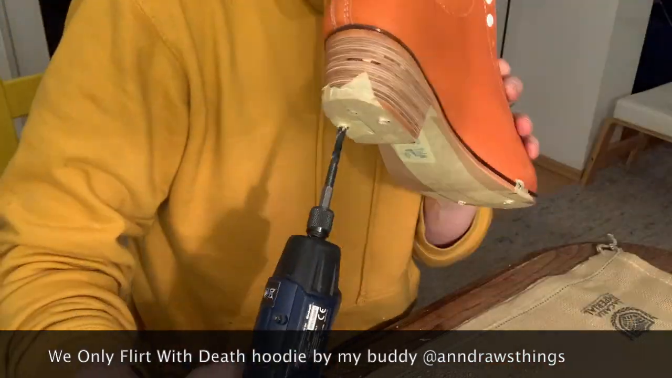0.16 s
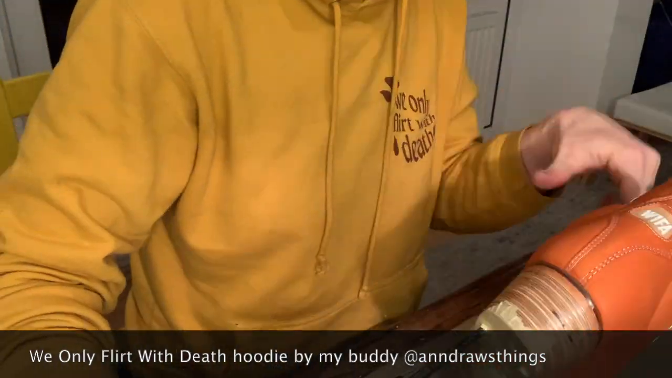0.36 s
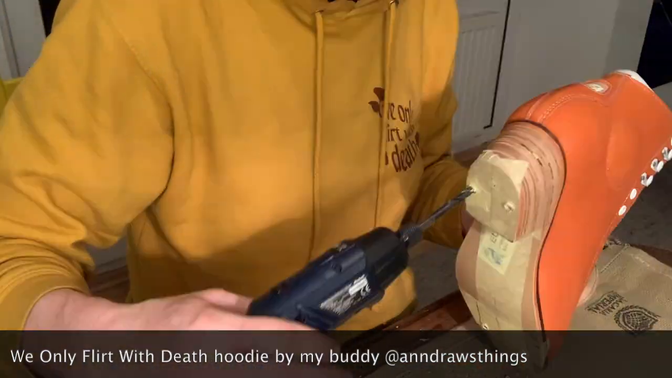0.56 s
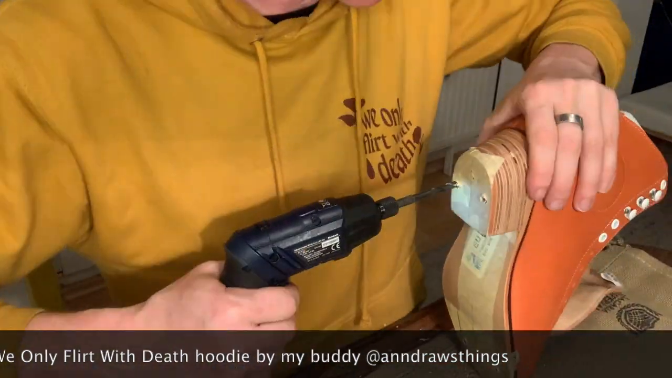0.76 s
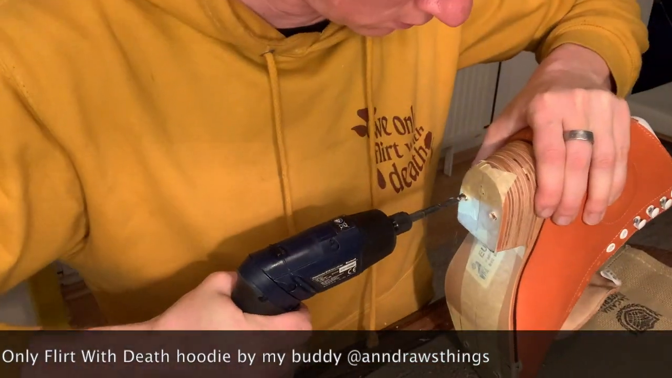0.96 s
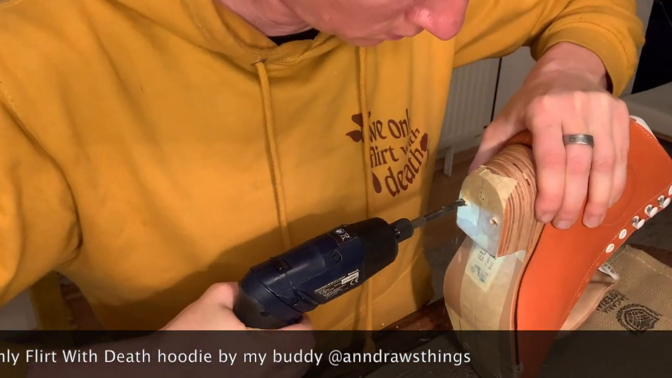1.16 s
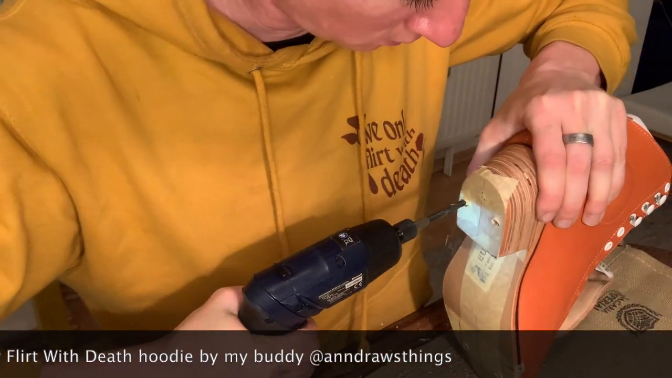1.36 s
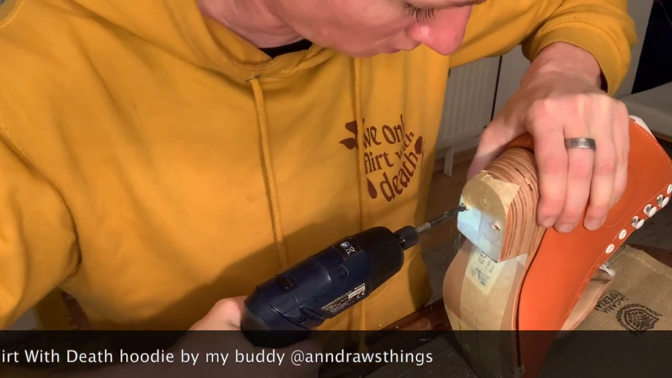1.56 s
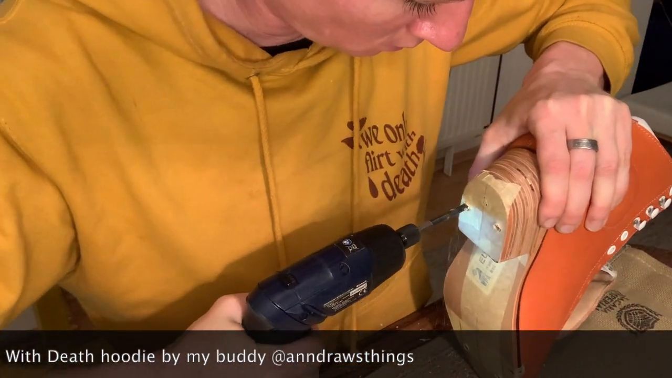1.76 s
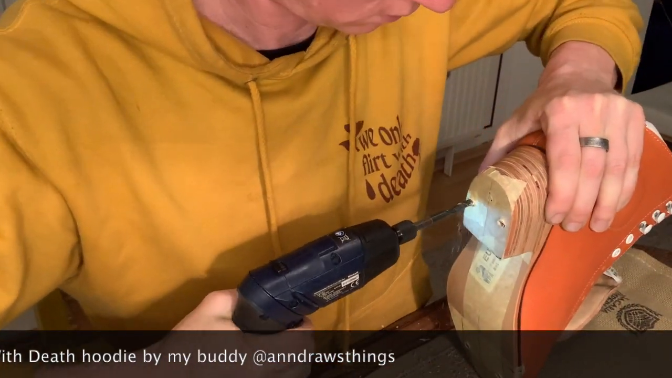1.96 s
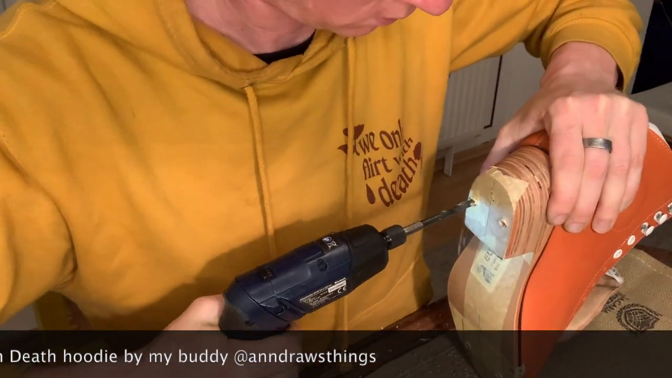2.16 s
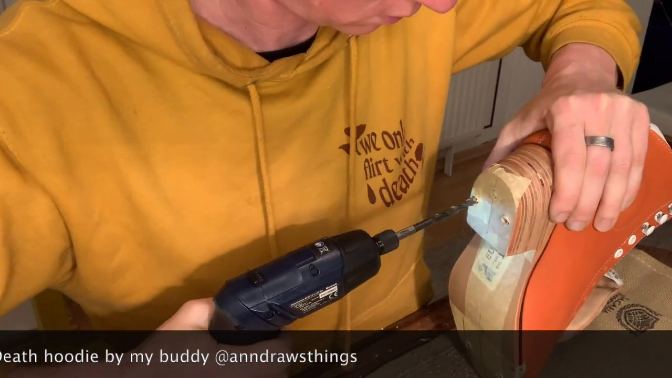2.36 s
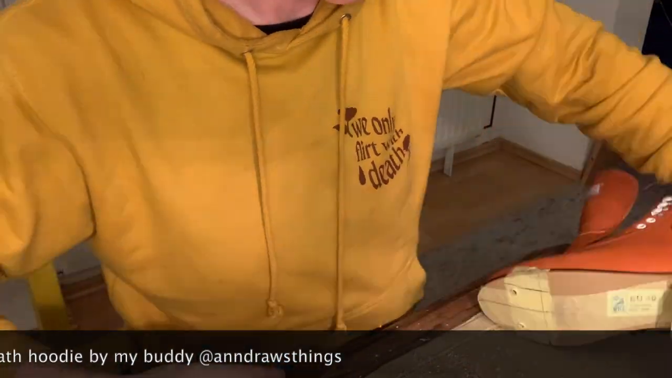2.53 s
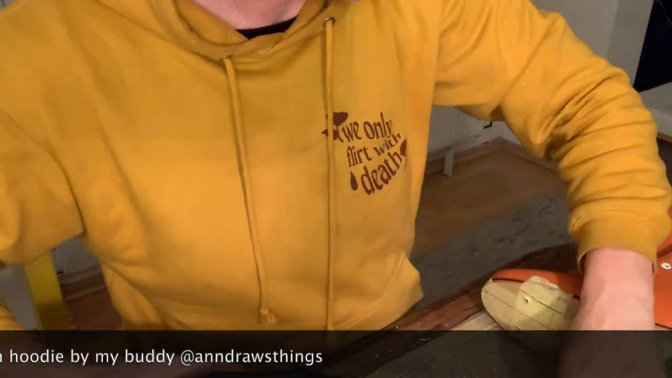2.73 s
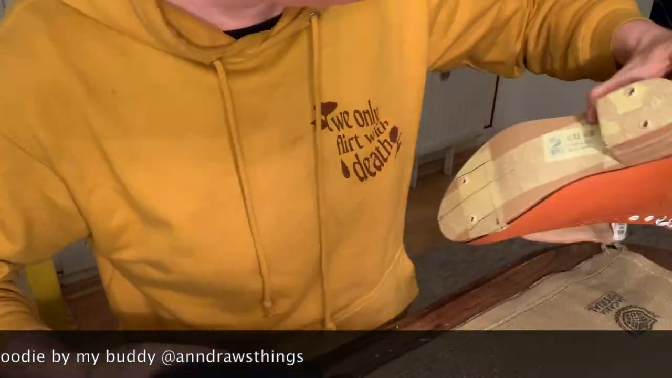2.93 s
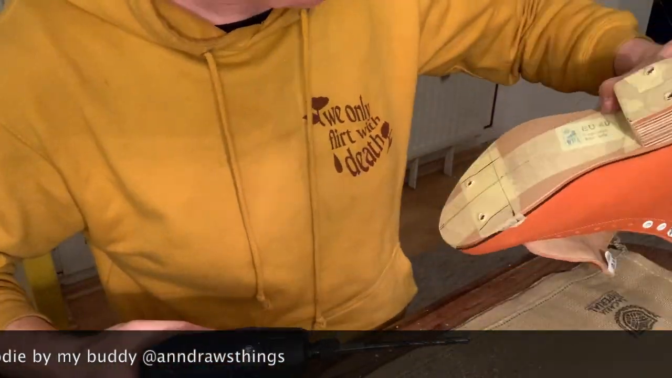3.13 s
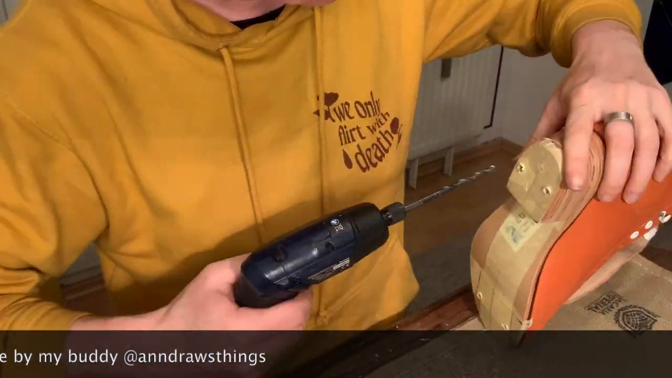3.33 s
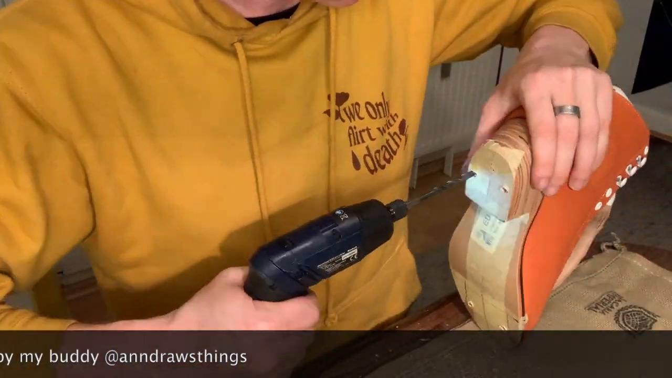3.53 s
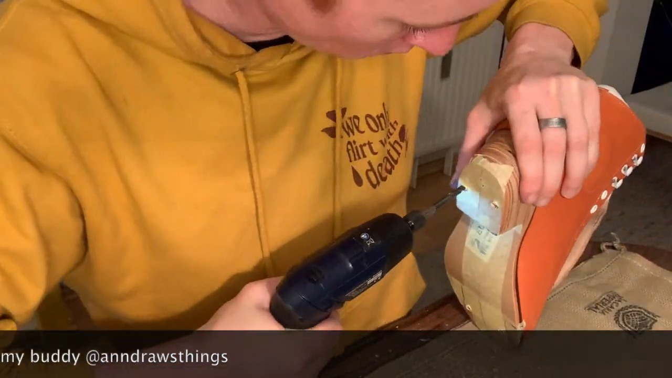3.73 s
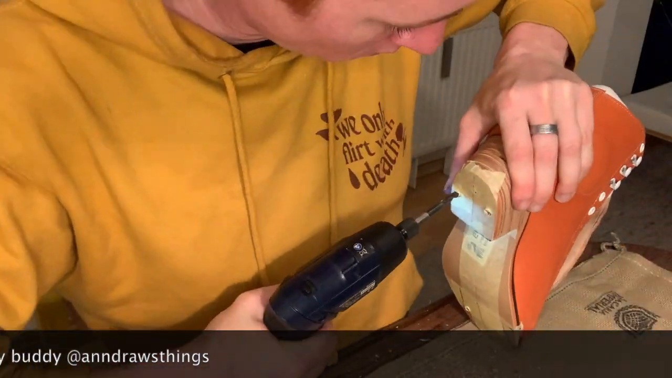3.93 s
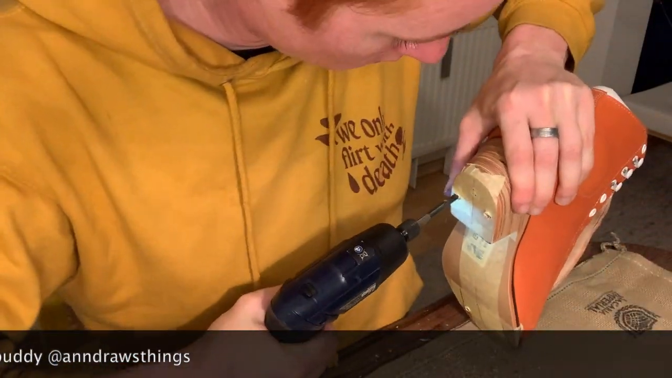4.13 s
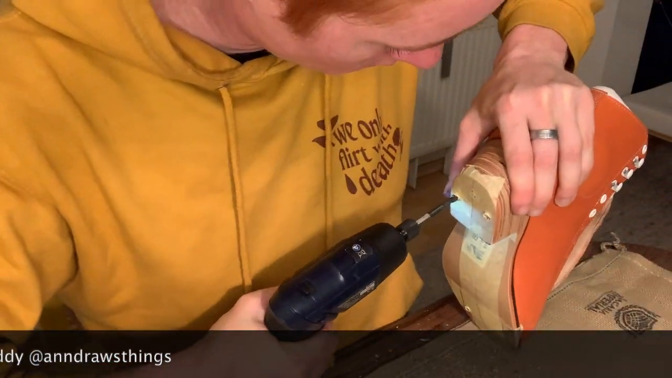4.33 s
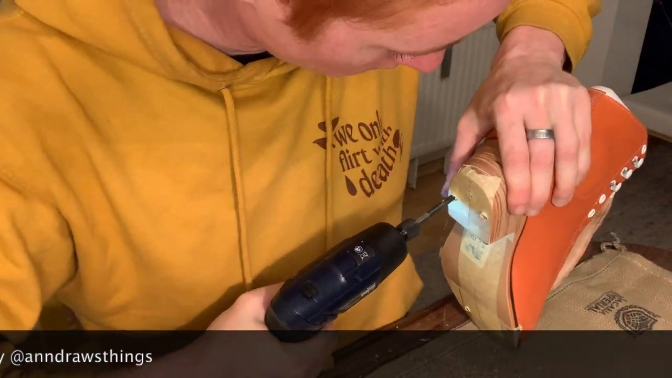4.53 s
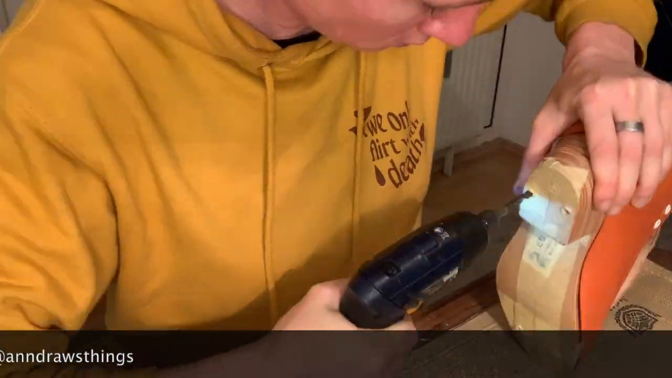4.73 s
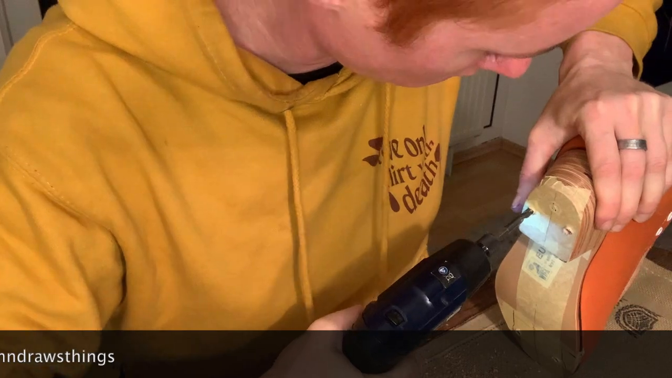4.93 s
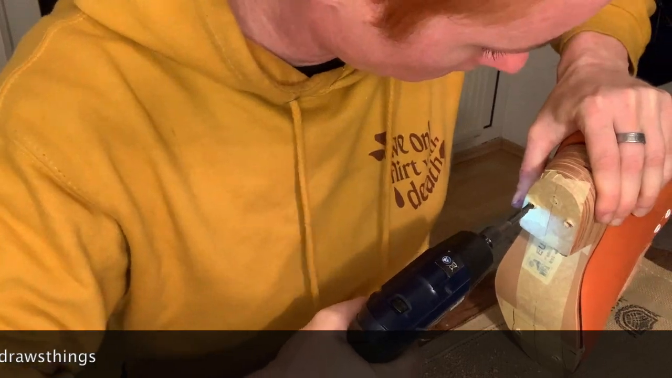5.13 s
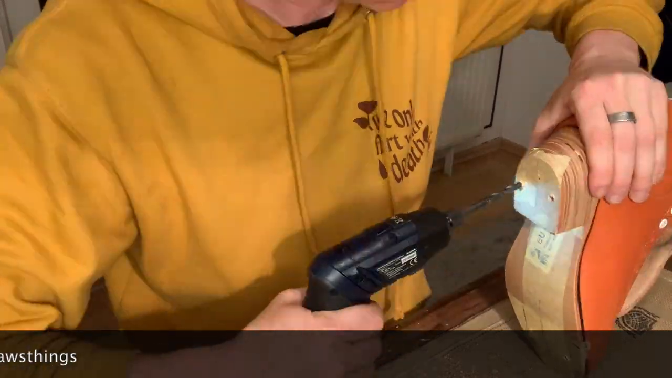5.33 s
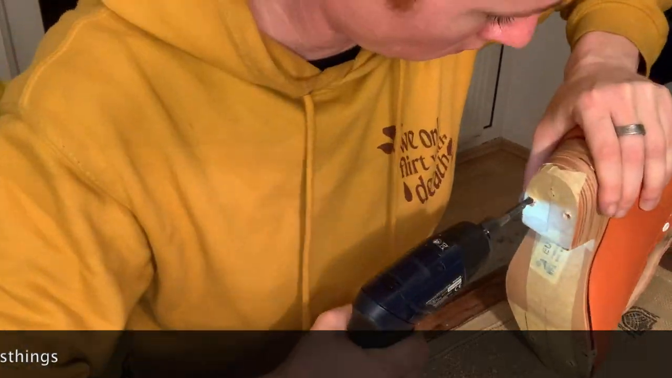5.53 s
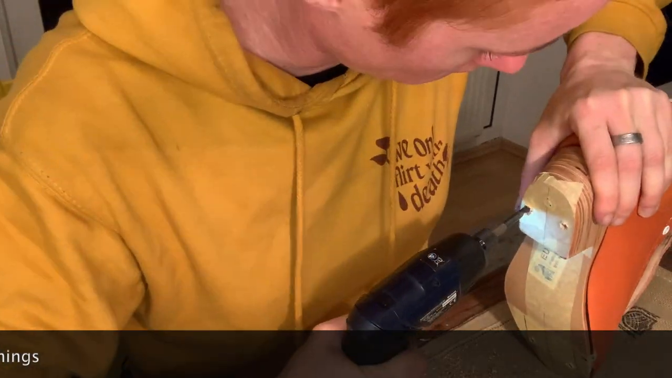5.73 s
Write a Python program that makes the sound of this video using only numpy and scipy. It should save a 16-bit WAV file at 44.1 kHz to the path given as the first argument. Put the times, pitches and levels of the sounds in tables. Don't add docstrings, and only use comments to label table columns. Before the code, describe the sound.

Two wooden knocks, then a geared drill motor whines and labours in wood, pauses for handling clatter, and drills again, bogging and catching.

```python
import sys
import numpy as np
from scipy import signal
from scipy.fft import rfft, irfft, next_fast_len
from scipy.io import wavfile
from scipy.ndimage import uniform_filter1d, map_coordinates

SR = 44100
rng = np.random.default_rng(int(sys.argv[2]) if len(sys.argv) > 2 else 0)


def convert_level_to_amplitude(level_db):
    exponent = np.asarray(level_db, float) / 20
    return 10 ** exponent


def to_wav(sig):
    pcm = np.clip(np.atleast_2d(sig), -1, 1) * 32767
    pcm = np.round(pcm).astype(np.int16)
    wavfile.write(sys.argv[1], SR, pcm.T)


N = 254898
T = np.arange(N) / SR


def unit(x):
    return x / np.sqrt(np.mean(x ** 2) + 1e-20)


def along(points, hz):
    f, v = np.transpose(points)
    return np.interp(np.log(hz + 1), np.log(f + 1), v)


def curves(rows):
    s, *cols = np.transpose(rows)
    return [np.interp(T, s, c) for c in cols]


def wobble(rate):
    return map_coordinates(rng.standard_normal(int(N * rate / SR) + 4), [T * rate])


def bump(s, width, power=2):
    return np.exp(-np.abs((T - s) / width) ** power)


def filtered(x, response):
    m = next_fast_len(N + SR // 2)
    return irfft(rfft(x, m) * response(np.fft.rfftfreq(m, 1 / SR)), m)[..., :N]


def peaks(modes, hz):
    return np.sqrt(1 + sum(convert_level_to_amplitude(2 * db) / (1 + (2 * (hz - c) / w) ** 2) for c, w, db in modes))


def rush(gain, alike, patchy_db):
    z = signal.stft(rng.standard_normal((2, N)), nperseg=256)[2]
    field = uniform_filter1d(rng.standard_normal(z.shape[1:]), size=8, axis=0)
    field = uniform_filter1d(field, size=5, axis=1)
    pair = signal.istft(z * convert_level_to_amplitude(patchy_db * unit(field)), nperseg=256)[1][:, :N]

    def mid_side(hz):
        turn = np.arccos(np.clip(along(alike, hz), -.99, .99)) / 2
        return gain(hz) * [np.cos(turn), np.sin(turn)]

    mid, side = filtered(pair, mid_side)
    return np.array([mid + side, mid - side]) / np.std(mid)


def ring(modes, t, lasting):
    drift = np.cumsum(rng.normal(0, .025, len(t)))
    out = 0
    for hz, db, t60 in modes:
        decay = convert_level_to_amplitude(db + rng.normal(0, 1.0) - 60 * t / (t60 * lasting))
        out = out + decay * np.sin(2 * np.pi * hz * rng.normal(1, .006) * t + drift)
    return out


# t/s, level/dB
ROOM_GAIN = [(.06, -51.5), (.1, -66), (.44, -53.5), (.46, -66.5), (.62, -64), (.66, -55.5), (2.0, -71.5),
             (2.6, -60), (3.1, -63.5)]
# f/Hz, level/dB per Hz
HUM_SPECTRUM = [(120, -73.5), (200, -28.5), (280, -18), (420, -11), (700, -14), (1000, -16.5),
                (1500, -20.5), (3000, -30), (8000, -40), (16000, -48.5)]
# f/Hz, width/Hz, level/dB
HUM_TONE = [(397, 16, 3.5), (616, 77, 14.5)]
# f/Hz, level/dB per Hz
CLOTH_SPECTRUM = [(710, -40.5), (1200, -10), (2300, -6.5), (3950, -6.5), (5900, -9), (8720, -10.5),
                  (16000, -23)]
# t/s, length/s, level/dB
SCUFFS = [(0, 0.025, -62.5), (0.032, 0.069, -67.5), (0.107, 0.044, -64), (0.191, 0.12, -72),
          (0.266, 0.048, -65), (0.284, 0.068, -69), (0.355, 0.09, -65), (0.554, 0.016, -73.5),
          (0.574, 0.046, -71), (0.666, 0.086, -70.5), (2.586, 0.08, -68.5), (2.824, 0.081, -81),
          (2.897, 0.072, -73), (2.985, 0.028, -67.5), (3.2, 0.045, -86), (3.287, 0.035, -80),
          (3.483, 0.065, -70.5), (3.503, 0.11, -65.5)]


def background():
    hum_db, = curves(ROOM_GAIN)
    low_db = -74 - 15 * np.clip(1 - T, 0, 1)
    low = rush(lambda hz: 1 / (1 + ((hz - 308) / 12) ** 4), [(200, .6)], patchy_db=1.5)
    hum = rush(lambda hz: convert_level_to_amplitude(along(HUM_SPECTRUM, hz)) * peaks(HUM_TONE, hz),
               [(200, 0.97), (800, 0.96)], patchy_db=2.0)
    fibres = unit(convert_level_to_amplitude(3.0 * wobble(90) + 2.3 * wobble(230)))
    cloth = fibres * rush(lambda hz: convert_level_to_amplitude(along(CLOTH_SPECTRUM, hz)), [(2000, 1.0), (8000, 0.26)], patchy_db=4)
    strokes = 0
    for s, length, db in SCUFFS:
        strokes = strokes + convert_level_to_amplitude(db) * np.clip(np.minimum(T - s, s + length - T) / 0.01, 0, 1)
    return convert_level_to_amplitude(low_db - 0.5) * low + convert_level_to_amplitude(hum_db - 5.0) * hum + strokes * cloth


# t/s, peak level/dB, thump/dB, hardness/dB, crack/dB
KNOCKS = [(0.004, -53, -19, -23, -20), (0.036, -45.5, -24, -30, -28), (0.281, -16.5, -20.5, -22, -38.5),
          (0.619, -13, -15.5, -12.5, -33.5), (0.829, -34, -24, 1, -10.5), (1.908, -31.5, -19, 3.5, -23),
          (2.561, -19.5, -59, -3, -33), (2.606, -35.5, -18, -19, -46), (2.829, -39.5, -41, -17, -57),
          (2.884, -47.5, -15, -11, -41), (3.274, -53, 12, -34, -41.5), (3.365, -55.5, -15, -26, -38),
          (3.484, -64, 4, -22, -30), (3.514, -52.5, 7, -17, -25), (3.557, -48, -13, -33, -36),
          (4.762, -34.5, 0.5, -28, -8), (4.838, -39, -25, -20, -30), (5.232, -34.5, -29, 1, -24),
          (5.296, -39.5, -25, -3, -10), (5.328, -31.5, -11, -28, -48)]
# f/Hz, level/dB, t60/s
BLOCK_MODES = [(485, -6, 0.058), (616, -5.5, 0.076), (752, 3, 0.035), (938.5, 3.5, 0.065),
               (1036, 10.5, 0.041), (1093, -4, 0.2), (1247, -9.5, 0.16), (1419, -11, 0.1)]
# f/Hz, level/dB, t60/s
CORNER_MODES = [(1454, 6.5, 0.059), (1712, 1.5, 0.06), (2010, -6.5, 0.11), (2470, 0.5, 0.08),
                (2584, 2.5, 0.056), (3030, -9.5, 0.027), (3400, -15.5, 0.031)]


def knocks():
    hand_damping = 0.76
    clack_band = signal.butter(3, (1300, 3400), 'bandpass', fs=SR, output='sos')
    out, t = np.zeros(N + SR), np.arange(SR // 4) / SR
    for s, db, thump_db, hard_db, crack_db in KNOCKS:
        thump = convert_level_to_amplitude(thump_db + 8.5 - 60 * t / 0.023) * np.sin(2 * np.pi * 420 * t)
        grit = signal.lfilter([1, 0, -1], [1, -.5, .45], rng.standard_normal(len(t)))
        crack = convert_level_to_amplitude(crack_db + 11.5 - 60 * t / 0.044) * grit
        body = ring(BLOCK_MODES, t, hand_damping)
        body = body + convert_level_to_amplitude(hard_db - 1.5) * ring(CORNER_MODES, t, hand_damping)
        dense = signal.lfilter([.03, 0, -.03], [1, -1.92, .94], rng.standard_normal(len(t)))
        body = body + convert_level_to_amplitude(2.0 - 60 * t / (0.062 * hand_damping)) * dense
        clack = signal.sosfilt(clack_band, rng.standard_normal(len(t)))
        body = body + convert_level_to_amplitude(hard_db + 11.5 - 60 * t / 0.031) * clack
        contact = 1 - np.exp(-(t / .0017) ** 2)
        out[round(s * SR) - 30:][:len(t)] += convert_level_to_amplitude(db - 6) * (body + thump + crack) * contact

    def thin_lows(hz):
        jf = 1j * hz + 1
        return 1 / (1 + (210 / jf) ** 2 + 300 / jf) * 1j * hz / (1j * hz + 150)

    return filtered(out[:N], thin_lows)


# t/s, peak level/dB, f/Hz, t60/s, share of tone
TICKS = [(0.065, -34, 7200, 0.02, 0.3), (0.335, -46, 6130, 0.031, 0.22), (.387, -41, 2200, 0.011, 0.57),
         (0.429, -58, 2470, .02, 1.7), (0.675, -47, 2070, 0.023, 0.74), (.717, -51.5, 3260, 0.024, 0.36),
         (2.644, -54, 3580, .015, 0.59), (2.658, -52, 9490, .01, .5), (2.697, -60, 9000, .01, 0.35),
         (2.795, -59.5, 4380, 0.018, 0.85), (2.847, -66, 5400, 0.056, 2.5),
         (2.975, -65, 9900, 0.0091, 0.28), (3.329, -66, 5000, 0.0054, .6), (3.515, -44, 3950, 0.0087, 0.49),
         (2.609, -53, 4500, .02, 0.98), (3.483, -62.5, 2490, 0.014, 0.55)]


def ticks():
    out, t = np.zeros(N + SR), np.arange(SR // 10) / SR
    for s, db, hz, t60, tone in TICKS:
        jitter = np.cumsum(rng.normal(0, .06 + 2e-5 * hz, len(t)))
        rough = np.sin(2 * np.pi * hz * t + jitter) * np.minimum(t * hz / 3, 1)
        click = 0.19 * np.diff(rng.standard_normal(len(t) + 1))
        out[round(s * SR):][:len(t)] += convert_level_to_amplitude(db - 60 * t / t60) * (tone * rough + click)
    return filtered(out[:N], lambda f: (1j * f / (1j * f + 500)) ** 2)


# f/Hz, t60/s
WALLS = [(200, 0.19), (1000, 0.25), (4000, 0.046), (12000, 0.011)]


def room(x):
    hz, t, z = signal.stft(rng.standard_normal((2, SR // 3)), SR, nperseg=256)
    tail = signal.istft(z * convert_level_to_amplitude(-60 * t / along(WALLS, hz)[:, None]), SR, nperseg=256)[1]
    return signal.fftconvolve(np.pad(x, (200, 0))[None], tail / np.linalg.norm(tail[0]), axes=1)[:, :N]


# pressed t/s, spin-up/s, let go t/s, run-down/s
PULLS = [
    (.783, .012, 2.4, .155),
    (3.541, .013, 5.8, .1),
]


def trigger():
    gain = 0
    for start, up, stop, down in PULLS:
        to_go = np.clip(1 - (T - start) / up, 0, 1)
        gone = np.clip((T - stop) / down, 0, 1)
        gain = gain + convert_level_to_amplitude(-36 * (to_go ** 2.1 + gone ** 2.74)) * (to_go < 1) * (gone < 1)
    return gain


WORKING_HZ = (440, 490, 565, 605)


def by_load(values, speed_hz):
    return np.interp(speed_hz, WORKING_HZ, values)


# t/s, shaft speed f/Hz, motor level/dB
STROKES = [
    [(.8, 515, -37), (.92, 503, -35), (1.04, 444, -35.5), (1.34, 443, -35.8), (1.855, 451, -35.3),
     (1.9, 555, -38), (2.0, 572, -38.7), (2.1, 575, -39.3), (2.2, 595, -40), (2.45, 614, -42)],
    [(3.55, 564, -44), (3.6, 621, -40), (3.635, 520, -39), (3.67, 515, -37.5), (3.71, 491, -36.5),
     (4.0, 481, -35.5), (4.07, 452, -35), (4.24, 497, -36.5), (4.36, 470, -36)],
    [(4.38, 437, -36), (4.49, 436, -36), (4.52, 488, -36), (4.68, 512, -35.7), (4.76, 546, -39.5)],
    [(4.81, 484, -37), (4.88, 448, -34.3), (5.21, 454, -34.5), (5.225, 535, -36.5), (5.29, 575, -38.5),
     (5.33, 620, -40.5)],
    [(5.345, 630, -46), (5.39, 635, -43), (5.405, 562, -39.5), (5.43, 528, -33.7), (5.5, 498, -34),
     (5.6, 489, -34.7), (5.66, 457, -35.2), (5.72, 455, -35.5), (5.78, 473, -34.5)],
]
BITES_S = (1.609, 4.222, 4.464, 4.96, 5.665)
# t/s, speed loss/%
CATCHES = [(.878, 4), (.936, 4), (.972, 3), (0.994, 4.1), (1.423, 1.5), (1.85, 2.5), (2.041, 5), (2.085, 6),
           (2.13, 5), (2.178, 4), (3.712, 4), (3.74, 3.4), (3.768, 4), (3.822, 3.5), (3.878, 3.5),
           (3.935, 3.4), (3.993, 6), (4.051, 7), (4.115, 16), (4.165, 7), (4.19, 3), (4.223, 14),
           (4.253, 8), (4.288, 25), (4.328, 22.5), (4.364, 25), (4.4, 4), (4.465, 3), (4.521, 6), (4.9, 2),
           (5.432, 4), (5.461, 3), (5.487, 3), (5.665, 4)]
DIP_PERCENT = (1.9, 1.9, 1.5, .6)
BITE_STRENGTH = (1.1, .65, 1.3, .9, .9)
# from t/s, to t/s, level/dB, dip share
PILOT = (1.05, 1.4, -13, .55)


def shaft_motion():
    gear_ratio, longer_flute = 27.2, .5
    speed_hz, motor_db = curves(sum(STROKES, []))
    starts = [rows[0][0] - .02 for rows in STROKES]
    stroke = np.clip(np.searchsorted(starts, T) - 1, 0, None)
    chuck = np.cumsum(speed_hz) / SR / gear_ratio
    angle = 2 * np.pi * (chuck - np.interp(BITES_S, T, chuck)[stroke])
    flutes = -np.cos(2 * angle) - longer_flute * np.cos(angle)
    shallow = np.interp(T, (1, *PILOT[:2]), (0, 1, 0))
    depth = by_load(DIP_PERCENT, speed_hz) * np.array(BITE_STRENGTH)[stroke] * (1 - PILOT[3] * shallow)
    dip = depth * flutes
    snag = sum(loss * bump(s, .006 + .0002 * loss, power=1.5) for s, loss in CATCHES)
    shaft = np.cumsum(speed_hz * (1 + (dip - snag + .5 * wobble(70)) / 100)) / SR
    return speed_hz, motor_db, stroke, angle, dip, snag, shaft


ORDER_3_DB = (-12.5, -13.5, -25, -28)
ORDER_6_DB = (-13.5, -19.5, -25.5, -24.5)
ORDER_9_DB = (-29.5, -14.5, -17.5, -26)
ORDER_16_DB = (-10, -5.5, -8.5, -7.5)
ORDER_32_DB = (0, -5, -5, -3)
# orders 3, 6, 16, 32 level/dB
GRIPS = [(0, 1.5, -1, 2), (2.5, -.5, -1.5, 1.5), (-2, .5, -1.5, -4), (1, 0, 1.5, -2.5), (3, -2, 2, -3)]
GRIP_9_DB = (1.5, -5, -1.5, 2, -1.5)
BREAKUP_DB = (1, 1.5, 3, 3, 1.5)
SLIP_DB = (11, 5, 4, 5, 4)
# t/s, level/dB
FADE_3 = [(.85, 5.5), (1.0, 0.5), (1.1, -3), (1.45, -1), (1.65, 2.5), (3.66, -7.5), (3.69, -1),
          (3.85, -2.5), (4.02, -1.5), (4.05, -16), (4.14, -2.5), (4.27, -1), (4.3, -0.5), (4.49, -7.5),
          (4.51, 1), (4.9, -1), (5.55, -4.5), (5.65, 2)]
# t/s, level/dB
FADE_6 = [(.9, 2), (1.15, -1.5), (1.4, 0.5), (1.85, 1), (3.64, 8), (3.72, 0.5), (3.95, -1), (4.05, 1),
          (4.24, 2), (4.28, 2.5), (4.36, -1), (4.4, 0), (4.5, -2.5), (4.56, 5), (4.75, 3), (5.0, -0.5),
          (5.5, 3), (5.7, 2)]
# t/s, level/dB
ENTRY = [(.83, 4), (.88, 6), (.96, 6.5), (1.03, 1), (1.84, 2.5), (1.87, 2), (2.1, 6.5), (2.2, 3.5),
         (2.41, 4.5), (2.44, -12.5), (3.6, 7), (4.0, -4), (4.04, -2.5), (4.5, -1), (4.75, 2.5), (4.85, 0),
         (5.4, 2.5), (5.7, 1.5)]
# shaft order, order it follows, level against it/dB
SIDEBANDS = [(19.24, 16, -27.5), (22.2, 16, -21.5), (24.2, 16, -22), (27.4, 16, -15), (35.1, 32, -25),
             (1.182, 3, -24), (1.75, 3, -15), (2.326, 3, -23)]


def order_levels(speed_hz, stroke, angle, snag):
    laws = (ORDER_3_DB, ORDER_6_DB, ORDER_16_DB, ORDER_32_DB)
    level = {}
    for order, values, grip_db in zip((3, 6, 16, 32), laws, np.transpose(GRIPS)[:, stroke]):
        level[order] = by_load(values, speed_hz) + grip_db
    level[9] = by_load(ORDER_9_DB, speed_hz) + np.array(GRIP_9_DB)[stroke]
    for order, depth in zip((3, 6, 16, 32, 9), BREAKUP_DB):
        level[order] = level[order] + depth * wobble(130) - .1 * depth ** 2
    slip = ((1 + np.cos(angle - 2 * np.pi * .08)) / 2) ** 6
    level[3] = level[3] + np.array(SLIP_DB)[stroke] * (.2 - slip) + curves(FADE_3)[0]
    for order, lead_order, db in SIDEBANDS:
        level[order] = level[lead_order] + db
    level[3] = level[3] - 1.1 * snag
    level[6] = level[6] + curves(FADE_6)[0] + .2 * snag
    level[16] = level[16] + curves(ENTRY)[0] - .9 * snag
    pilot_db = PILOT[2] * np.interp(T, PILOT[:2], (1, 0))
    level[32] = level[32] + pilot_db + .6 * snag - 3.5
    return level


# f/Hz, phase/radians each way
PORT_PHASE = [(1400, .1), (2650, .05), (3100, .35), (4500, 0.39), (14000, 0.59)]


def gear_tones(level, speed_hz, shaft):
    mesh_s = 0.057
    meshed = uniform_filter1d(np.interp(T - mesh_s, T, trigger()), size=2000)
    seated = np.maximum(meshed, T > PULLS[1][0])
    tones = 0
    for order, db in level.items():
        slow, fast = .2, .16
        if 9 < order < 32:
            slow, fast = .3, .4
        elif 3 < order < 32:
            fast = .26
        flutter = unit(1 + slow * wobble(75) + fast * (wobble(220) + 1j * wobble(220)))
        spread = along(PORT_PHASE, order * speed_hz) * (1 + .3 * wobble(8))
        phase = 2 * np.pi * order * shaft + np.array([spread, -spread])
        onset = meshed if order < 10 else seated
        tones = tones + convert_level_to_amplitude(db + 2.5) * onset * (flutter * np.exp(1j * phase)).real
    return tones


# f/Hz, level/dB per Hz
HISS_SPECTRUM = [(900, -32), (1500, -16.5), (2300, -12), (3200, -10.5), (3850, -4.5), (4500, -6),
                 (6000, -3.5), (8000, -1), (12400, -2.5), (15500, -3), (16200, -38)]
# f/Hz, width/Hz, level/dB
SHELL = [(2470, 10, 20), (2600, 54, 11), (3150, 130, 10), (4570, 74, 4.5)]
# f/Hz, left-right likeness
HISS_ALIKE = [(900, .9), (1900, 0.66), (2550, 0.9), (3200, .8), (3850, .4), (4800, 0.33), (6820, .1),
              (15000, 0.85)]


def brush_hiss(throb):
    noise = rush(lambda hz: convert_level_to_amplitude(along(HISS_SPECTRUM, hz)) * peaks(SHELL, hz), HISS_ALIKE, patchy_db=1.8)
    return convert_level_to_amplitude(throb - 2.0) * noise


# f/Hz, level/dB per Hz
CUTTING_SPECTRUM = [(30, -13.5), (200, -11.5), (500, -11.5), (1000, -16), (1600, -7.5), (2200, -3),
                    (3000, -32), (5000, -58.5)]
# f/Hz, width/Hz, level/dB
BLOCK_UNDER_BIT = [(618, 62, 10.5), (930, 90, 19), (1120, 13, 12), (1081, 26, 23.5), (1120, 35, -3),
                   (1414, 22, 19.5)]
# f/Hz, left-right likeness
CUTTING_ALIKE = [(60, -0.69), (130, -0.84), (290, -0.52), (640, 0.38), (1410, 0.84), (3100, 0.51),
                 (6820, 0.094), (15000, 0.68)]
BIT_DB = (-15.5, -16.5, -13, -13.5)


def cutting(throb, speed_hz):
    chips = unit(convert_level_to_amplitude(1.6 * wobble(150)))
    noise = rush(lambda hz: convert_level_to_amplitude(along(CUTTING_SPECTRUM, hz)) * peaks(BLOCK_UNDER_BIT, hz),
                 CUTTING_ALIKE, patchy_db=3.0)
    return convert_level_to_amplitude(by_load(BIT_DB, speed_hz) + 0.67 * throb) * chips * noise


# f/Hz, width/Hz
NOTCH = (3800, 620)
# t/s, level/dB
NOTCH_LEFT = [(.8, -5), (1.05, -7), (1.8, -5), (2.0, -8), (3.6, -11), (4.2, -10), (4.4, -7), (4.6, -12),
              (5.0, -9), (5.3, -5), (5.45, -11), (5.7, -9)]


def shared_notch(direct):
    centre_hz, width_hz = NOTCH
    band = filtered(direct.mean(axis=0), lambda hz: 1 / (1 + (2 * (hz - centre_hz) / width_hz) ** 4))
    return direct - (1 - convert_level_to_amplitude(curves(NOTCH_LEFT)[0] + 2.5 * wobble(25))) * band


# t/s, hiss half width/s, hiss level/dB, gear silence half width/s
RELEASES = [
    (4.75, .02, -3, .03),
    (5.207, .005, 0, .008),
    (5.336, .0045, -24, .048),
]
# f/Hz, width/Hz, level/dB
GEARBOX = [(2630, 340, 9), (3150, 140, 8), (4550, 300, 2)]


def drill():
    speed_hz, motor_db, stroke, angle, dip, snag, shaft = shaft_motion()
    tones = gear_tones(order_levels(speed_hz, stroke, angle, snag), speed_hz, shaft)
    throb = .5 * dip + 0.13 * wobble(14) + 0.49 * wobble(45)
    hiss = brush_hiss(throb) * convert_level_to_amplitude(sum(db * bump(s, width) for s, width, db, _ in RELEASES))
    coasting = convert_level_to_amplitude(sum(-25 * bump(s + .008, width, power=4) for s, _, _, width in RELEASES))
    running = trigger() * convert_level_to_amplitude(motor_db)
    gears = filtered(running * trigger() * coasting * tones, lambda hz: peaks(GEARBOX, hz))
    return shared_notch(gears + running * (hiss + cutting(throb, speed_hz)))


# t/s, length/s, first f/Hz, last f/Hz, level/dB
WHISTLES = [(.83, 0.39, 2476, 2455, -48), (2.606, .025, 625, 615, -53.5), (2.886, .018, 600, 595, -58),
            (2.77, 0.16, 412, 418, -68.5), (0.83, 0.62, 1040, 1030, -50), (1.2, 0.89, 1030, 1020, -58),
            (.84, .17, 930, 915, -58.5), (4.242, 0.25, 2480, 2370, -45), (4.5, .24, 880, 895, -57),
            (4.76, 0.032, 850, 540, -47), (5.417, 0.14, 885, 1000, -53), (1.83, 0.35, 1690, 1712, -50.5),
            (2.13, 0.31, 1085, 1110, -51.5), (2.25, 0.12, 5520, 5900, -51.5), (2.613, 0.17, 541, 490, -62),
            (3.567, 0.077, 1095, 1070, -44), (5.228, 0.087, 1070, 1065, -47.5),
            (5.25, 0.055, 1735, 1760, -50), (5.247, .04, 620, 680, -54), (5.328, 0.083, 1200, 1120, -44.5),
            (5.345, .04, 5300, 5800, -58), (5.437, 0.18, 612, 620, -55.5)]


def whistles():
    out = 0
    for s, length, first_hz, last_hz, db in WHISTLES:
        glide = np.interp(T, [s, s + length], [first_hz, last_hz])
        pitch = glide + min(.02 * first_hz, 30) * wobble(150)
        level = convert_level_to_amplitude(db + 2 * wobble(50) + min(first_hz / 300, 3) * wobble(190))
        swell = bump(s + length / 2, length / 2, power=4.0)
        out = out + level * swell * np.sin(2 * np.pi * np.cumsum(pitch) / SR)
    return out


# t/s, left minus right level/dB
DRILL_PAN = [(.8, -1.4), (1.3, -2.4), (1.9, -2.4), (2.3, -3.2), (3.6, -3.2), (4.2, -1.5), (5.2, -.6),
             (5.7, -1.3)]


def scene():
    bed = background()
    hits = knocks() + ticks()
    motor = drill() + whistles()
    treble = filtered(motor, lambda hz: 1 / (1 + (3300 / (hz + 1)) ** 6))
    lean = convert_level_to_amplitude(curves(DRILL_PAN)[0] * [[.5], [-.5]]) - 1
    return motor + lean * treble + hits * convert_level_to_amplitude([[.3], [-.3]]) + convert_level_to_amplitude(-21.0) * room(hits) + bed


def top_cut(x):
    return signal.sosfilt(signal.butter(12, 16800, fs=SR, output="sos"), x)


def record(dry):
    top_hz = 16060
    mix = filtered(dry, lambda hz: np.clip((top_hz - hz) / 250, 0, 1))
    return top_cut(mix)


dry = scene()
out = record(dry)
to_wav(out)
```